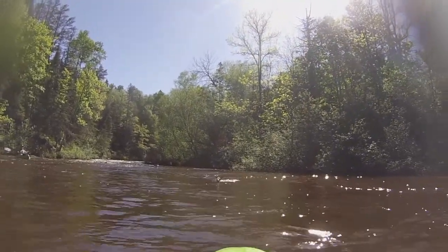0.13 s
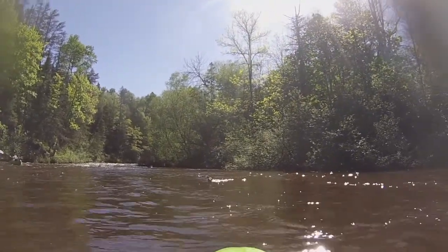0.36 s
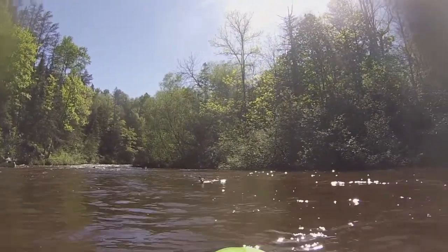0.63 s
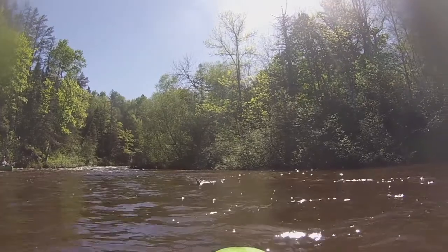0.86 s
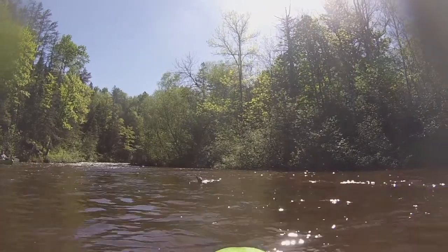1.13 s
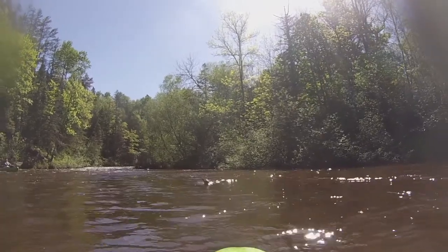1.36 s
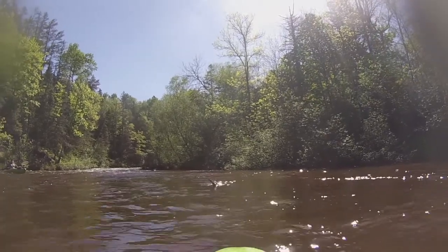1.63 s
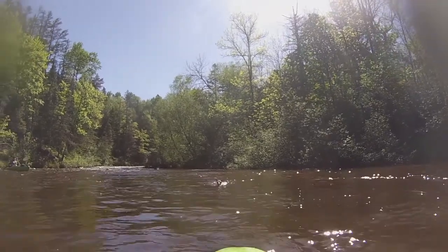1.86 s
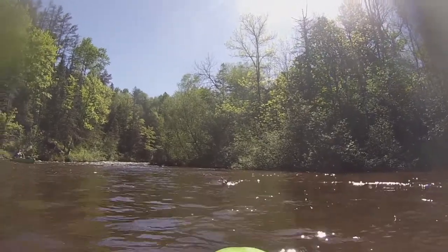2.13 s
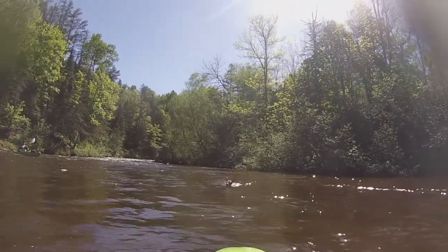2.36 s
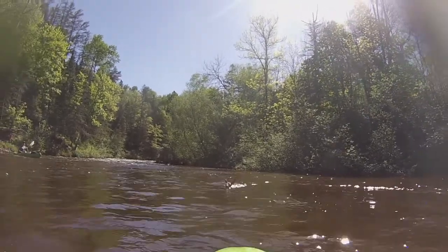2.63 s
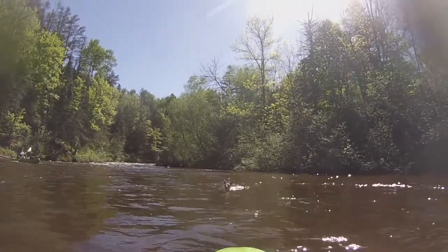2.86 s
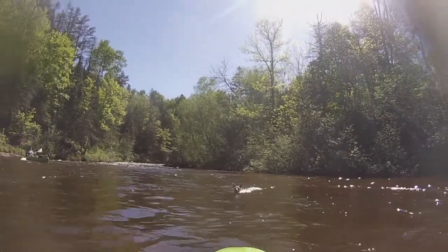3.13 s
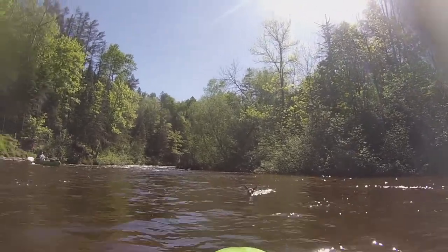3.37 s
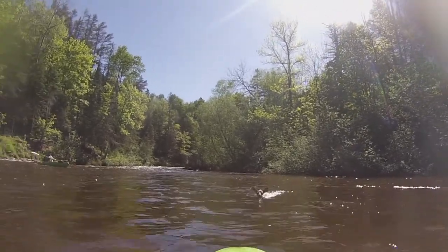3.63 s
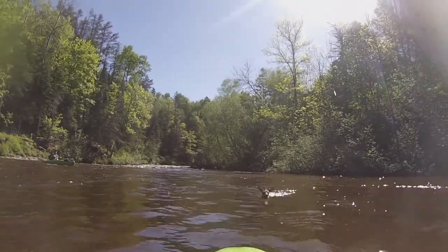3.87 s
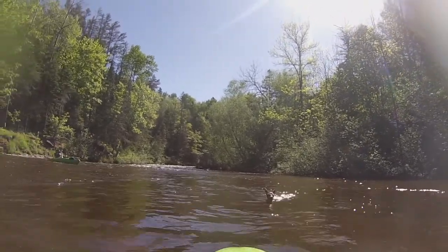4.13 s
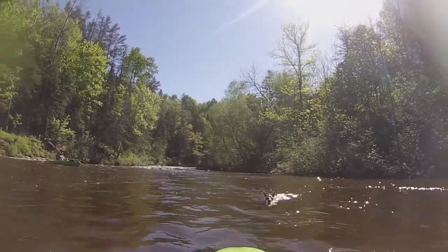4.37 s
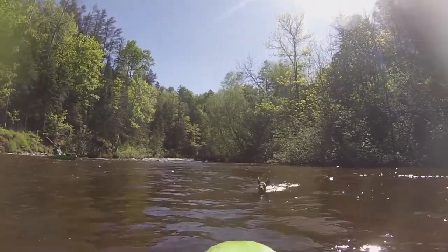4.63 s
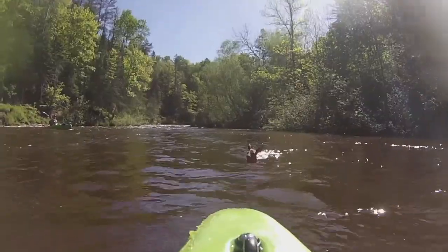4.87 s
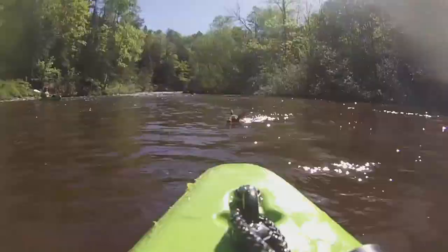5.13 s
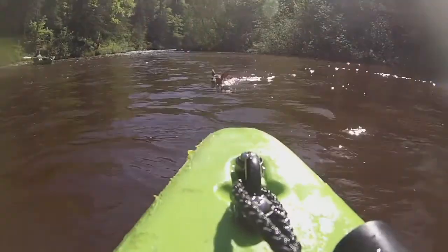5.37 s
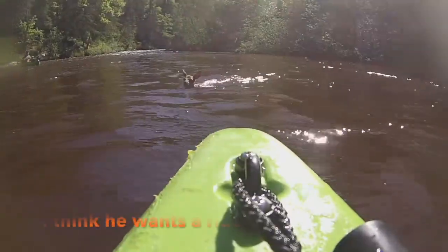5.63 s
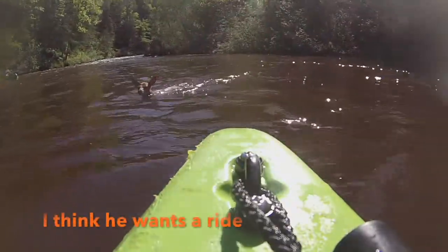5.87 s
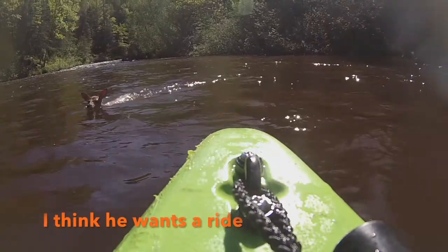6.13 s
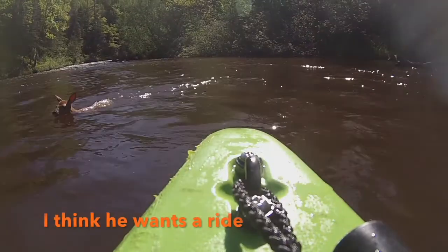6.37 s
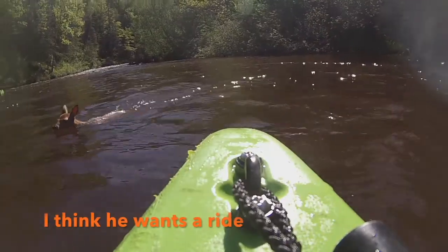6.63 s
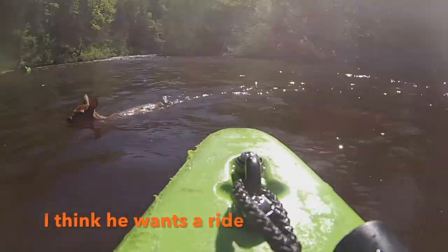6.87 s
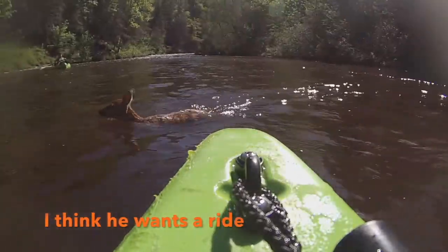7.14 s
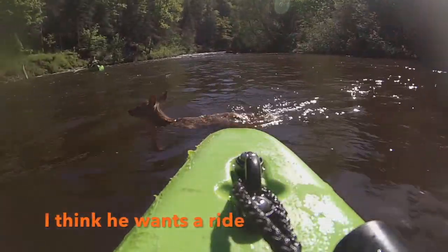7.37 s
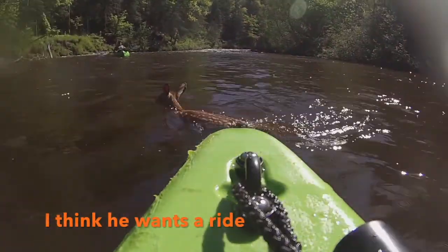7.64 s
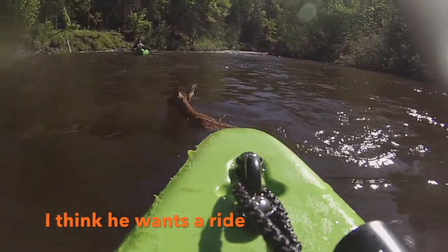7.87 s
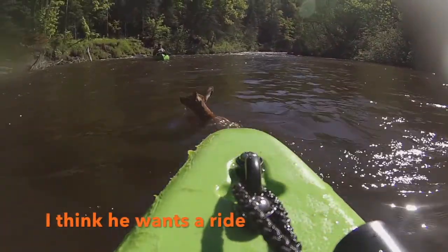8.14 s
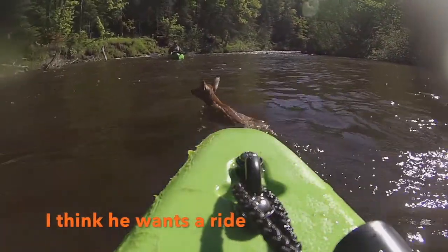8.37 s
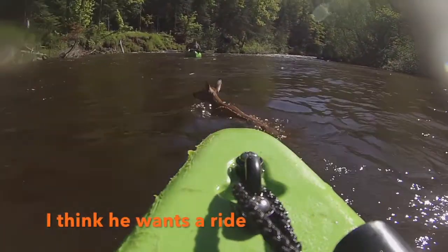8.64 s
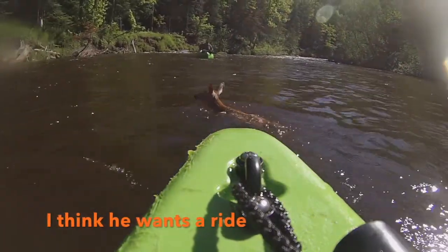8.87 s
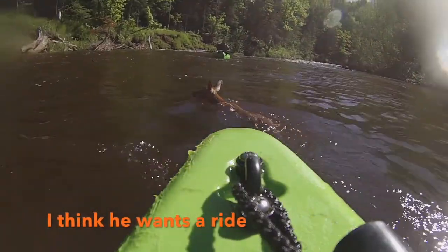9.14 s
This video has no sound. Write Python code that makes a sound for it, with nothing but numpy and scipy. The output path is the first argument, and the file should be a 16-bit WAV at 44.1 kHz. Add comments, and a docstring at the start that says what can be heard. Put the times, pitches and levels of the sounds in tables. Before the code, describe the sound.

Quiet river bed with sparse plastic taps, then three loud ratcheting snaps with scrapes and wobbling rattles, then paddle knocking and swishing along a hull.

```python
"""Camera mount clicking on a kayak bow

A small camera in a sealed case rides the bow of a plastic kayak on a quiet river. Its mount is pushed down
three notches: decaying sines snap, shaped noise scrapes, and a damped sine sways the arm while its joint rattles.
A paddle taps and drags on the hull in short tones, bright clicks and flow noise; water swishes, plops, trickles.
A bird calls far off in a few gliding overtones over a steady noise bed. Gain control ducks after the snaps."""
import sys
import numpy as np
from scipy import signal
from scipy.fft import rfft, irfft, next_fast_len
from scipy.io import wavfile
from scipy.ndimage import uniform_filter1d, minimum_filter1d, map_coordinates

SR = 44100
rng = np.random.default_rng(int(sys.argv[2]) if len(sys.argv) > 2 else 0)


def gain_from_decibels(decibels):
    """Convert decibel values to linear amplitude factors."""
    exponent = np.asarray(decibels, float) / 20
    return 10 ** exponent


def to_wav(s):
    """Save 16-bit WAV."""
    ch = np.atleast_2d(s).T  # columns
    pcm = np.round(np.clip(ch, -1, 1) * 32767)  # PCM
    wavfile.write(sys.argv[1], SR, pcm.astype(np.int16))


N = 407925
T = np.arange(N) / SR  # seconds


def noise(n=N):
    """White noise of rms 1."""
    return rng.standard_normal(n)


def unit(x):
    """Scaled to rms 1."""
    return x / np.sqrt(np.mean(x ** 2) + 1e-20)


def filtered(x, response):
    """x times a complex response of frequency."""
    m = next_fast_len(N + SR // 2)
    hz = np.fft.rfftfreq(m, 1 / SR) + 1  # 1 Hz up, to keep clear of log 0
    return irfft(rfft(x, m) * response(hz), m)[:N]


def coloured(x, points):
    """x through a curve of (Hz, dB) points on a log frequency axis, rms 1."""
    hz, db = np.transpose(points)
    return unit(filtered(x, lambda f: gain_from_decibels(np.interp(np.log(f), np.log(hz), db))))


def resonant(x, peaks):
    """x through parallel (Hz, width in Hz, dB) resonances of alternating sign, rms 1."""
    def response(f):
        total = 0
        for k, (centre, width, db) in enumerate(peaks):
            band = 1j * f * width / (centre ** 2 - f ** 2 + 1j * f * width)
            total = total + (-1) ** k * gain_from_decibels(db) * band
        return total
    return unit(filtered(x, response))


def wobble(rate):
    """A smooth random curve, rate knots a second."""
    knots = noise(int(N * rate / SR) + 4)
    return map_coordinates(knots, [T * rate])


def gate(start, end, edge_s):
    """1 inside the span, with ramps of edge_s outside it, then 0."""
    return np.clip(np.minimum(T - start, end - T) / edge_s + 1, 0, 1) ** 2


def swells(rows, rise_db_per_s, fall_db_per_s):
    """Gain that climbs to each (s, dB) peak and sinks after it."""
    return sum(gain_from_decibels(db - np.where(T < s, rise_db_per_s * (s - T), fall_db_per_s * (T - s))) for s, db in rows)


def blip(t, hz, rise_ms, fall_ms):
    """A swell of 8 dB over rise_ms, a fall of 8 dB per fall_ms, and an unsteady tone under it."""
    shape = gain_from_decibels(np.where(t < 0, -8 * (1000 * t / -rise_ms) ** 2, -8000 * t / fall_ms))
    shake = uniform_filter1d(uniform_filter1d(rng.standard_normal((2, len(t))), size=28), size=28)
    drift = 0.11 * np.cumsum(shake[0])
    tone = gain_from_decibels(20 * shake[1]) * np.sin(2 * np.pi * hz * t + drift)
    return shape, shape * tone


def add(out, s, piece):
    """Mixes a piece in at time s."""
    spot = out[round(s * SR):][:len(piece)]
    spot += piece[:len(spot)]


# What a blow rings in case and mount. Each row: pitch in Hz, level in dB against the blow, t60 in seconds.
CASE_RING = [(232, 1.5, 0.02), (460, 4.5, 0.0029), (760, -13.5, 0.0043)]
# A tooth jumps its notch. Each row: start in seconds, blow in dB, crack in dB, crack pitch in Hz,
# lurch peak in ms.
NOTCH_JUMPS = [(4.5047, 7, 19.5, 3300, 18), (4.83005, 18, 28.5, 3700, 14), (5.1682, 17.5, 29, 3900, 13.5)]
# The mount seats again. Each row: start in seconds, blow in dB.
MOUNT_SEATINGS = [(4.9037, 1.5), (5.2624, 7)]


def snaps():
    """A blow rings the case; the tooth pings, rebounds lower, and the freed arm lurches the other way."""
    tooth_rise_s, tooth_t60_s = 0.0005, 0.0045
    rebound_late_s, rebound_hz, rebound_t60_s, rebound_db = 0.0017, 2050, 0.009, -9
    grit_db = -4  # against the rebound
    out, t = np.zeros(N), T[:SR // 5]
    ring = -sum(gain_from_decibels(level - 60 * t / t60) * np.sin(2 * np.pi * hz * t) for hz, level, t60 in CASE_RING)
    grit_band = signal.butter(2, [1000, 4500], "bandpass", fs=SR)
    for s, db, crack_db, crack_hz, lurch_ms in NOTCH_JUMPS:
        ping = (1 - np.exp(-t / tooth_rise_s)) * gain_from_decibels(-60 * t / tooth_t60_s) * np.sin(2 * np.pi * crack_hz * t)
        u = 1000 * t / lurch_ms
        lurch = gain_from_decibels(-10.5) * (3.2 * u) ** 4 * np.exp(-4 * u)  # peaks at u = 1
        add(out, s, gain_from_decibels(db) * ring + gain_from_decibels(crack_db) * ping + lurch)
        rebound = np.sin(2 * np.pi * rebound_hz * rng.normal(1, 0.04) * t)
        grit = unit(signal.lfilter(*grit_band, noise(len(t))))
        decay = gain_from_decibels(rebound_db - 60 * t / rebound_t60_s)
        add(out, s + rebound_late_s, gain_from_decibels(db) * decay * (rebound + gain_from_decibels(grit_db) * grit))
    for s, db in MOUNT_SEATINGS:
        jab = np.exp(-((T - s + 0.0001) / 0.00045) ** 2)  # the last instant of pressure before the tooth drops in
        u = (T - s - 0.009) / 0.011
        shove = -gain_from_decibels(-4) * u * np.exp(-u ** 2)  # one way, then the other
        out += gain_from_decibels(db) * (gain_from_decibels(1) * jab + shove)
        add(out, s, gain_from_decibels(db) * ring)
    return out


# Colour of plastic rubbing. Each row: frequency in Hz, relative level in dB per Hz.
RUB_COLOUR = [(150, -22.5), (250, 0.5), (1160, -12), (1720, -6.5), (2050, -13), (3180, -11), (3920, -25.5),
              (4470, -22), (7380, -37), (12000, -43), (15600, -58), (22000, -120)]
# Teeth rubbing between notches. Each row: hardest moment in seconds, rise in ms, fall in ms, pressure in dB.
TOOTH_RUBS = [(4.523, 9.7, 8.7, -14.5), (4.542, 11, 20.5, -13), (4.559, 4, 3.8, -17.5),
              (4.569, 7.1, 12, -20.5), (4.851, 14, 4.5, -18.5), (4.866, 9.7, 10.2, -14),
              (4.894, 9.6, 6.3, -12.5), (4.903, 9.9, 12.4, -7), (5.173, 4.1, 14, -19.5),
              (5.188, 1.3, 1.5, -14.5), (5.204, 7.8, 11, -19), (5.2215, 1.4, 26, -32.5),
              (5.248, 9.2, 5.8, -8.5), (5.258, 7.7, 12.8, -5), (5.275, 2.2, 2.3, -21),
              (4.925, 2.5, 2.3, -25.5)]


def scrapes():
    """Rough plastic slides in uneven grains, pressing harder and then easing."""
    edge_s, swell_db = 0.002, 12.5
    press = np.zeros(N)
    for hard, rise_ms, fall_ms, db in TOOTH_RUBS:
        start, end = hard - rise_ms / 1000, hard + fall_ms / 1000
        push_db = np.interp(T, [start, hard, end], [db - swell_db, db, db - swell_db])
        press += gate(start, end, edge_s) * gain_from_decibels(push_db)
    grains = gain_from_decibels(3.5 * wobble(600)) * noise()
    return press * coloured(grains, RUB_COLOUR)


# The arm is let go and sways. Each row: start in seconds, swing in dB, sway rate in Hz, slack of the joint in dB.
ARM_RELEASES = [(3.859, -38, 39, 0), (4.58, -8, 33.13, -20), (4.92, -4.5, 35.73, -5), (5.278, 1, 36.98, -1)]
# The boat rocks the arm. Each row: peak in seconds, level in dB.
BOAT_NUDGES = [(1.47, -58.5), (2.79, -60.5), (6.47, -53), (6.71, -49.5), (7.0, -67), (7.44, -49.5)]


def arm():
    """Camera mass on a springy arm; the slack joint ticks around each pass of a wide swing through the middle."""
    arm_t60_s = 0.83
    rattle_db, rattle_power, rattle_t60_s, scatter_s = -23, 2.1, 0.023, 0.0023  # rattle grows as a power of swing
    swing, knocks, t = np.zeros(N), np.zeros(N), T[:SR]
    for s, db, hz, slack_db in ARM_RELEASES:
        add(swing, s, -gain_from_decibels(db - 60 * t / arm_t60_s) * np.sin(2 * np.pi * hz * t))
        for k, (late, size) in enumerate(rng.standard_normal((20, 2))):
            passing = (k + 1) / (2 * hz)
            swing_db = db - 60 * passing / arm_t60_s
            knock_db = slack_db + rattle_power * swing_db + 1.6 * size
            add(knocks, s + passing + scatter_s * (late - 1.5), gain_from_decibels(knock_db - 60 * t[:2000] / rattle_t60_s))
    joint = [(1300, 920, 4), (2300, 620, 7), (3300, 900, 2)]
    chatter = resonant(resonant(noise(), joint), joint)  # two passes sharpen the bands
    reach = np.abs(signal.hilbert(swing))
    loose = gain_from_decibels(-24) * reach ** rattle_power
    rattle = gain_from_decibels(rattle_db) * (knocks + loose) * chatter
    # low rumble of the mount, following the swing
    shudder = gain_from_decibels(-30) * reach * resonant(noise(), [(75, 41, -1), (128, 86, -5), (330, 250, -17)])
    rocking = gain_from_decibels(-66.5) + swells(BOAT_NUDGES, rise_db_per_s=46, fall_db_per_s=32.5)
    idle = rocking * resonant(noise(), [(39, 5.4, 0)])
    return swing + rattle + shudder + idle


# Upper hull resonances. Each row: pitch in Hz, phase wander in half rad^2 per second, relative level in dB.
HULL_RESONANCES = [(2400, 2640, 3), (3220, 570, -7), (4140, 340, -10.5), (5400, 1600, -13),
                   (6300, 680, -17)]
# Rounded notes without an edge, water and soft bumps on the hull.
# Each row: peak in seconds, level in dB, pitch in Hz, length in ms.
WATER_PLOPS = [(0.389, -54, 940, 7.3), (0.491, -50, 810, 5.5), (0.507, -54, 1360, 4),
               (0.806, -56, 910, 5.6), (1.673, -49.5, 570, 5.7), (2.719, -31.5, 613, 4.3),
               (2.729, -34, 593, 4.9), (2.737, -39, 600, 4), (2.7292, -46.5, 1120, 7.4),
               (2.753, -40, 330, 13.4), (3.0032, -46, 600, 8.4), (3.082, -42, 605, 13),
               (3.8128, -38, 612, 5.8), (3.844, -37, 2380, 2.5), (5.108, -43.5, 1260, 4),
               (5.124, -47, 1119, 8), (6.03, -48, 344, 7.1), (6.0718, -44, 616.5, 5),
               (6.3768, -40, 594, 8.9), (6.4, -52.5, 602, 13.6), (6.4, -49.5, 92, 21),
               (6.449, -38.5, 575, 5.7), (6.5, -47, 97, 18), (6.506, -51, 1400, 4.7),
               (6.515, -47, 294, 8.9), (6.5566, -44, 555, 6.9), (6.618, -46, 716, 7),
               (6.621, -62, 1290, 7.3), (6.65, -59, 780, 14), (6.719, -51.5, 1286, 25),
               (6.755, -55, 1490, 10), (6.79, -47, 570, 7.8), (6.806, -59, 1580, 5.7),
               (6.9404, -37, 1160, 5.9), (7.007, -37.5, 1200, 4), (7.0083, -24.5, 658, 2.7),
               (7.0192, -43, 1180, 14), (7.038, -26, 529, 11), (7.0786, -44, 1236, 2.5),
               (7.156, -30, 1760, 2.8), (7.167, -38, 1140, 5.5), (7.17, -42, 296, 7.5),
               (7.225, -42.5, 577, 18), (7.301, -35, 1240, 11.5), (7.32, -27, 293, 3.2),
               (7.425, -27, 265, 3.7), (7.466, -34, 1310, 6), (7.509, -40, 1220, 3),
               (7.51, -30.5, 2230, 2.5), (7.5368, -22.5, 1233, 4), (7.54, -28.5, 1230, 2.7),
               (7.547, -42, 1740, 2.5), (7.609, -35.5, 1070, 3), (7.689, -45.5, 1134, 10),
               (7.657, -42, 1383, 3.8), (8.118, -58, 3300, 3.6), (8.121, -47, 1150, 7.4),
               (8.131, -51, 3270, 2.7), (8.104, -45, 3200, 2.8), (8.155, -31.5, 1840, 2.2),
               (8.158, -36.5, 1130, 4.3), (8.232, -34, 1374, 2.8), (8.3946, -43, 573, 5.7)]
# Hard taps and slips of the paddle.
# Each row: peak in seconds, level in dB, pitch in Hz, length in ms, edge in dB before a common 5 dB cut.
PADDLE_TICKS = [(0.584, -55, 2290, 3.5, -3), (1.414, -46.5, 1190, 3, -7.5), (3.003, -45.5, 1190, 2.5, -5),
                (3.063, -51, 1590, 4.2, -9), (3.081, -53, 1050, 6, -2), (3.102, -47, 2850, 3, -7),
                (3.111, -47, 1690, 3.4, -1.5), (3.226, -51.5, 1085, 5.4, -21), (3.279, -48, 306, 4.7, -10),
                (3.786, -36, 1610, 0.55, -7), (3.79, -46, 1140, 3.8, 1), (3.7992, -27, 1080, 0.44, -3),
                (3.813, -39.5, 1290, 4.2, -1.5), (3.827, -56, 2400, 9.4, 3), (3.8619, -24, 1730, 1.6, -9.5),
                (4.05, -45.5, 1040, 1.4, -11), (5.623, -46.5, 610, 2, -11), (5.655, -50, 690, 3.3, -17),
                (5.977, -48.5, 1280, 4.4, -31.5), (6.0685, -43, 1047, 4.9, -14),
                (6.673, -44, 1045, 6.1, -8), (6.693, -46.5, 3300, 1.6, 0), (6.88, -44, 1200, 4.1, -1),
                (7.0944, -40, 2400, 2.4, -23.5), (7.226, -38, 1380, 3, -26), (7.236, -36.5, 1700, 2.9, 4),
                (7.253, -46, 6300, 0.73, -10), (7.274, -33.5, 4130, 2.3, 2), (7.289, -39, 3160, 5.1, -15),
                (7.3173, -28, 1680, 2.1, -11), (7.324, -46, 4300, 3.1, 18), (7.34, -27.5, 1230, 3.1, -7),
                (7.348, -25, 1200, 2.2, -23), (7.348, -33, 2400, 3, -1), (7.3578, -25.5, 1240, 4.4, -3),
                (7.379, -34, 4400, 2.6, 7), (7.3846, -26, 1250, 7.5, -10), (7.394, -47, 5900, 1.4, 0),
                (7.404, -21, 1380, 2.2, -4), (7.408, -24.5, 2330, 2.6, -6), (7.422, -38, 4150, 1.8, 2),
                (7.427, -27.5, 1130, 3.6, -2.5), (7.524, -45.5, 4200, 3, -10), (7.5297, -33.5, 1190, 2, -4),
                (7.606, -40, 2400, 6, 0), (7.624, -36.5, 2010, 5.2, -14), (7.643, -43.5, 1130, 9.9, -2.5),
                (7.671, -48, 4250, 3.3, 3), (7.6719, -43.5, 1550, 8, 0), (8.071, -46, 1134, 2.8, -5),
                (8.0955, -22, 1784, 1.56, -21), (8.103, -37, 1170, 4, -3), (8.131, -47, 1630, 5.4, -2.5),
                (8.171, -33.5, 1310, 2.9, -11.5), (8.2073, -48, 1205, 2.4, 0.5),
                (8.256, -43.5, 2990, 3, -5), (8.258, -49, 1180, 4.4, -6.5), (8.313, -51.5, 1610, 5.8, -8)]


def taps():
    """Each has its own pitch; its edge rings the upper resonances unevenly, and low ones thud through the hull."""
    plop_edge_db, plop_rise, tick_rise = -53, 1, 0.89  # rise as a share of length; the fall fills up two lengths
    out, thuds, t = np.zeros(N), np.zeros(N), T[:SR // 8] - 0.03
    events = [(*row, plop_edge_db, plop_rise) for row in WATER_PLOPS]
    events += [(*row, tick_rise) for row in PADDLE_TICKS]
    for s, db, hz, length_ms, edge_db, rise in events:
        shape, tone = blip(t, hz, rise * length_ms, (2 - rise) * length_ms)
        upper = np.zeros(len(t))
        for centre, spread, level in HULL_RESONANCES:
            wander = np.cumsum(uniform_filter1d(noise(len(t)), size=7)) * np.sqrt(2 * spread / SR)
            phase = 2 * np.pi * centre * rng.normal(1, 0.018) * t + wander
            upper += gain_from_decibels(level + rng.normal(0, 2.7)) * np.sin(phase)
        edge = gain_from_decibels(edge_db - 5) * shape ** 1.13 * upper
        add(out, s + t[0], gain_from_decibels(db) * (tone + edge))
        thud_db = db - 19 - 4.8 * np.log2(hz / 500)  # lower notes thud more
        add(thuds, s + t[0], gain_from_decibels(thud_db) * shape ** 0.13 * noise(len(t)))
    return out + np.std(thuds) * resonant(thuds, [(97, 20, 0), (296, 44, 0.02)])


# Click edges of the sharpest taps. Each row: start in seconds, level in dB.
TAP_CLICKS = [(7.353, -49), (7.378, -61), (7.403, -50), (7.424, -53), (7.525, -52), (7.604, -53),
              (7.853, -55.5), (8.549, -60.5)]


def tap_clicks():
    """Bright clicks of the sharpest taps: very short treble noise bursts that die away at once."""
    t60_s = 0.014
    bursts = sum(gain_from_decibels(db - 60 * np.maximum(T - s, 0) / t60_s) * gate(s, s + 0.04, 0.0017) for s, db in TAP_CLICKS)
    return bursts * coloured(noise(), [(1500, -30), (5000, -3), (9000, -5), (13000, -18), (16000, -30)])


# The long paddle stroke. Each row: time in seconds, flow in dB.
STROKE_FLOW = [(5.95, -83), (6.04, -67), (6.07, -62.5), (6.22, -73), (6.3, -59), (6.55, -60), (6.61, -55),
               (6.85, -54.5), (7.03, -55), (7.4, -48.5), (7.66, -54), (7.91, -59), (8.45, -65.5)]
# Small laps against the hull. Each row: peak in seconds, flow in dB.
HULL_LAPS = [(.488, -61), (2.98, -66.5), (3.8, -62)]


def flow():
    """How hard water moves along the hull: the stroke's curve plus the laps."""
    s, db = np.transpose(STROKE_FLOW)
    stroke = gain_from_decibels(np.interp(T, s, db, -120, -120))
    return stroke + swells(HULL_LAPS, rise_db_per_s=95, fall_db_per_s=35.5)


# Colour of water along the hull. Each row: frequency in Hz, relative level in dB per Hz.
SWISH_COLOUR = [(300, -40.5), (540, -2.5), (780, -2), (870, -16), (1270, -0.5), (2100, -13.5), (3300, -17),
                (4000, -29), (5500, -25.5), (7500, -30.5), (8600, -35), (12000, -47.5)]


def strokes():
    """Smooth flow noise along the hull, with dull thumps below."""
    swish = coloured(gain_from_decibels(1.8 * wobble(40)) * noise(), SWISH_COLOUR)
    thump = resonant(gain_from_decibels(4.5 * wobble(30)) * noise(), [(90, 70, 0), (250, 200, -3), (560, 150, -3)])
    return flow() * (gain_from_decibels(-1) * swish + gain_from_decibels(-4.5) * thump)


def droplets():
    """Small random plips whose level follows the water flow."""
    out, t = np.zeros(N), T[:SR // 25] - 0.01
    for when, pitch, size, life in rng.random((1100, 4)):
        hz = 1000 * 5 ** pitch ** 1.5
        db = -4 * np.log(size + 0.05) - 11 * pitch
        plip = blip(t, hz, 1 + 2 * life, 1 + 3 * life)[1]
        add(out, when * N / SR, gain_from_decibels(db) * plip)
    return gain_from_decibels(-8) * flow() * unit(out)


# Water runs off the blade in bright surges. Each row: start in seconds, end in seconds, level in dB.
BLADE_SURGES = [(6.061, 6.171, -66.5), (6.27, 6.347, -63), (6.583, 6.659, -57), (6.675, 6.995, -61.5)]
# Bright bands of the runoff, passed twice. Each row: centre in Hz, width in Hz, relative level in dB for one pass.
RUNOFF_BANDS = [(2510, 540, 4), (3390, 760, 1), (7530, 1200, -4)]


def trickle():
    """Water off the blade: grainy hiss in a few bright bands."""
    runs = sum(gain_from_decibels(db) * gate(start, end, 0.018) for start, end, db in BLADE_SURGES)
    grains = gain_from_decibels(3 * wobble(160)) * noise()
    return runs * resonant(resonant(grains, RUNOFF_BANDS), RUNOFF_BANDS)


# One far call. Each row: time in seconds, pitch of the unheard fundamental in Hz, relative level in dB.
BIRD_CALL = [(3.5, 465, -14), (3.56, 543, 0), (3.63, 562, 2), (3.72, 567, 5), (3.76, 558, -1)]
# Only its upper overtones carry. Each row: multiple of the pitch, level in dB added to the call's.
BIRD_OVERTONES = [(6, -90), (7, -88), (8, -77), (9, -90)]


def bird():
    """A thin call of unsteady overtones that glides up, gains strength and holds."""
    s, hz, db = np.transpose(BIRD_CALL)
    turns = np.cumsum(np.interp(T, s, hz) + 1.6 * wobble(25)) / SR
    voice = sum(gain_from_decibels(level + 2.5 * wobble(20)) * np.sin(2 * np.pi * k * turns) for k, level in BIRD_OVERTONES)
    return gate(s[0] + 0.02, s[-1], 0.03) * gain_from_decibels(np.interp(T, s, db)) * voice


# Far water and microphone hiss. Each row: frequency in Hz, relative level in dB per Hz.
RIVER_COLOUR = [(12, -37), (20, -3), (45, -10.5), (65, -7.5), (96, -12), (347, -15), (434, -18),
                (542, -16.5), (718, -21), (1260, -17), (1960, -24), (13500, -43.5), (16000, -44)]


def river():
    """Far water and hiss: a nearly steady bed of coloured noise."""
    level_db = -58 + 0.53 * wobble(1.8) + 0.71 * wobble(15)
    return gain_from_decibels(level_db) * coloured(noise(), RIVER_COLOUR)


def scene():
    """Sound through hull and case loses its treble; air sounds, tap clicks and the scraping teeth keep theirs."""
    solid = snaps() + arm() + taps() + droplets()
    dull = signal.sosfilt(signal.butter(3, 7000, fs=SR, output="sos"), solid)
    bright = scrapes() + tap_clicks() + strokes() + trickle() + bird() + river()
    return (dull + bright)[None]


def top_cut(x):
    """Nothing passes above the cut-off."""
    return signal.sosfilt(signal.butter(12, 16570, fs=SR, output="sos"), x)


def record(dry):
    """Gain control reacts a few ms late, holds and creeps back; the first peaks clip."""
    over_db = np.clip(20 * np.log10(np.abs(dry[0]) + 1e-9) + 12, 0, 14)  # above -12 dB, cut by 14 dB at most
    held_db = -minimum_filter1d(-over_db, size=6001, origin=3000)  # highest of the last 6001 samples
    release_db = 20 * T  # 20 dB recovered per second
    cut_db = np.maximum.accumulate(held_db + release_db) - release_db
    late_db = np.pad(uniform_filter1d(cut_db, size=200), (190, 0))[:N]
    x = dry * gain_from_decibels(-late_db)
    x = x / (1 + np.abs(x) ** 12) ** (1 / 12)  # clips just short of full scale
    x = signal.sosfilt(signal.butter(6, 15500, fs=SR, output="sos"), x)  # rounds the clipped edges
    x = signal.sosfilt(signal.butter(1, 6, "highpass", fs=SR, output="sos"), x)  # no steady pressure passes
    return top_cut(x)


dry = scene()
out = record(dry)
to_wav(out)
```